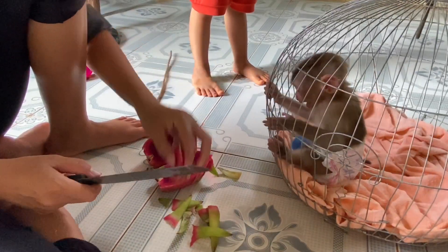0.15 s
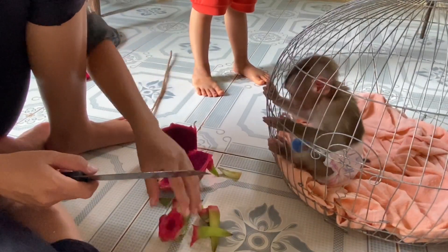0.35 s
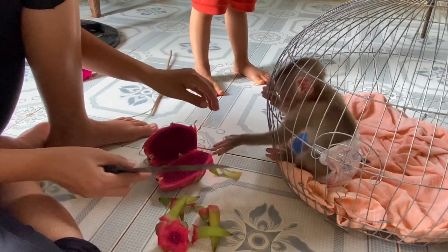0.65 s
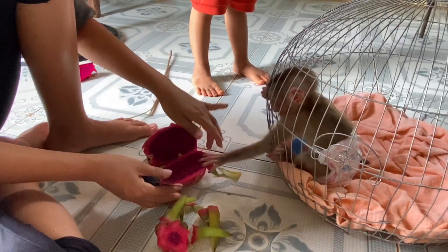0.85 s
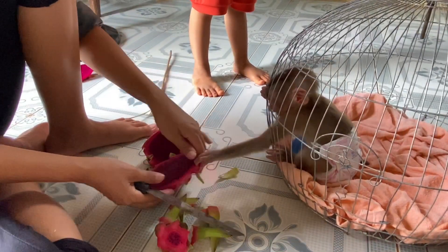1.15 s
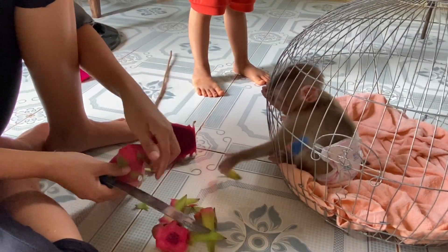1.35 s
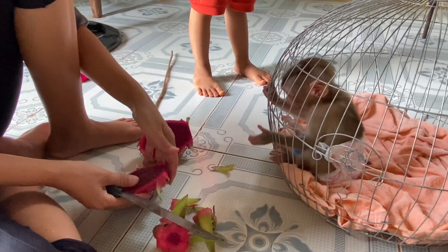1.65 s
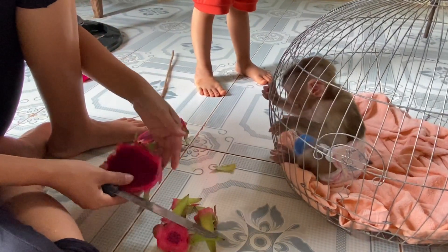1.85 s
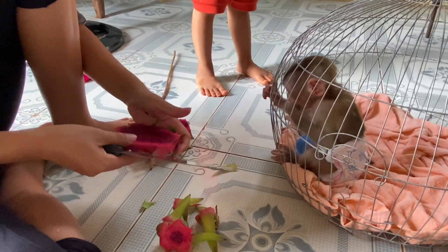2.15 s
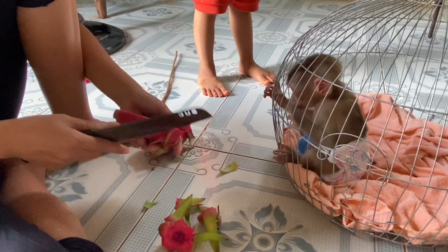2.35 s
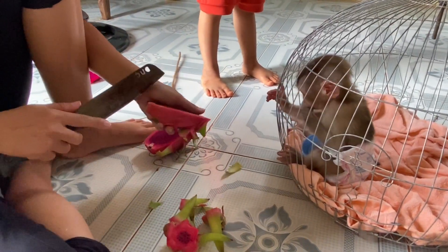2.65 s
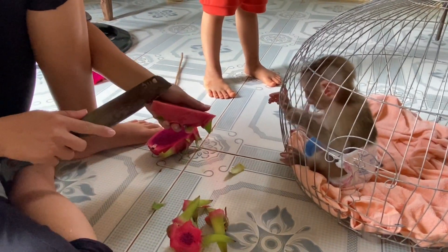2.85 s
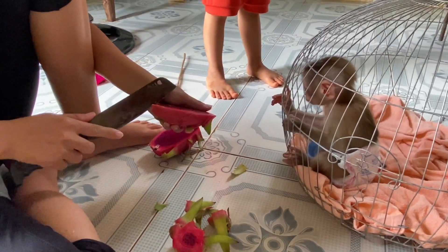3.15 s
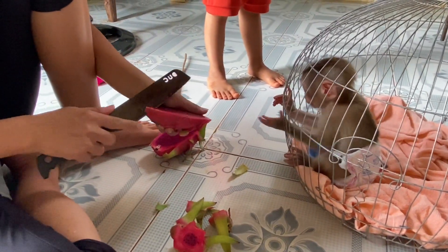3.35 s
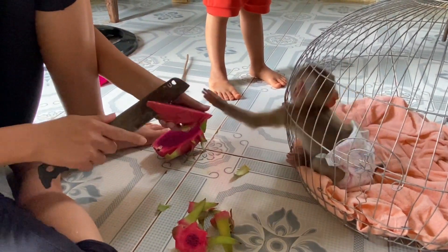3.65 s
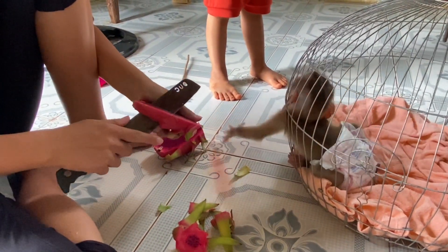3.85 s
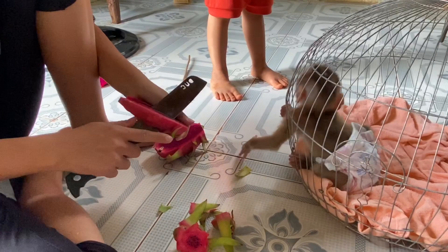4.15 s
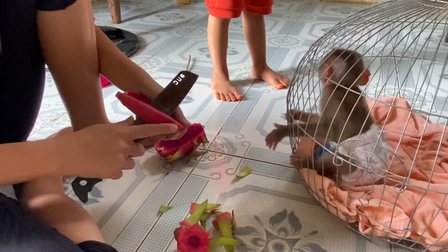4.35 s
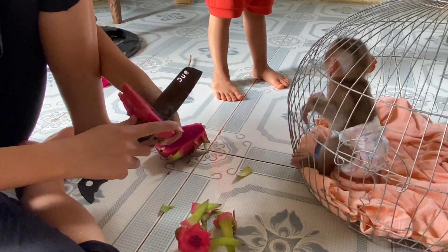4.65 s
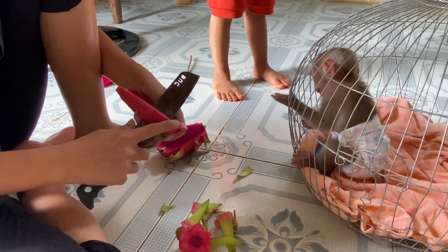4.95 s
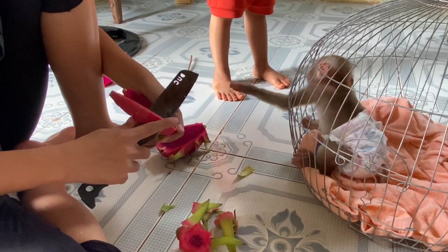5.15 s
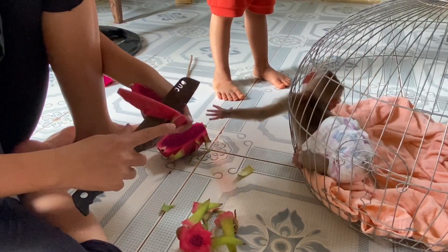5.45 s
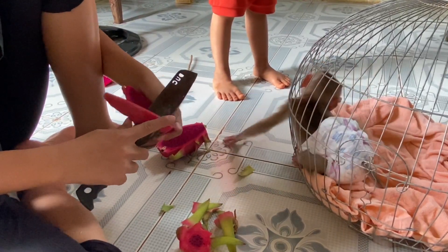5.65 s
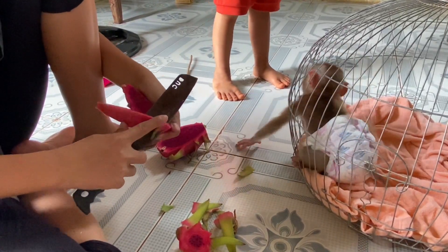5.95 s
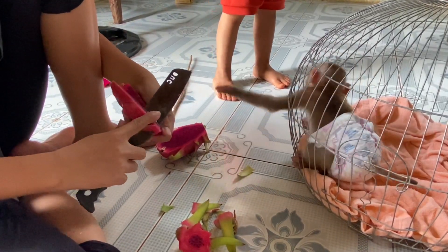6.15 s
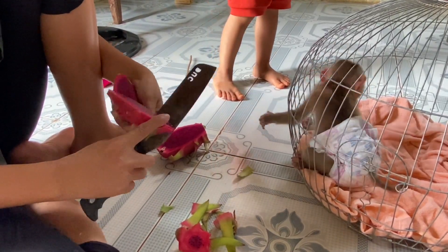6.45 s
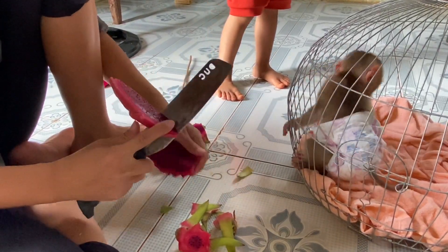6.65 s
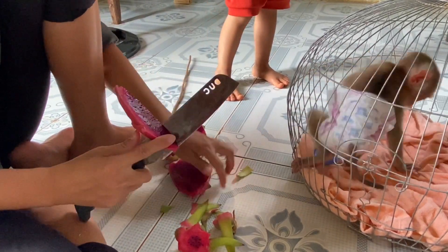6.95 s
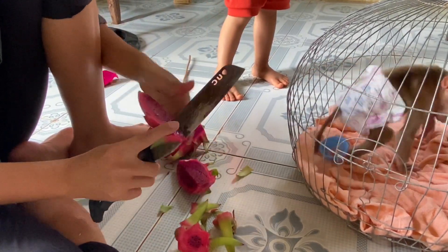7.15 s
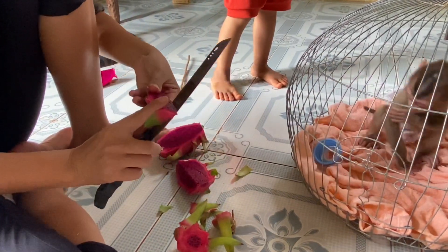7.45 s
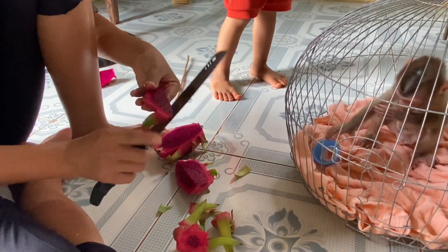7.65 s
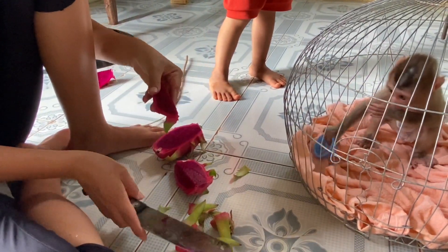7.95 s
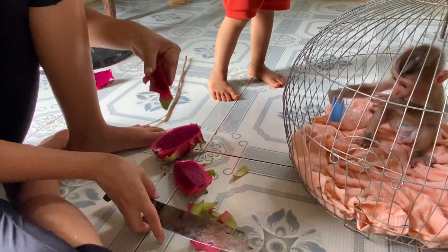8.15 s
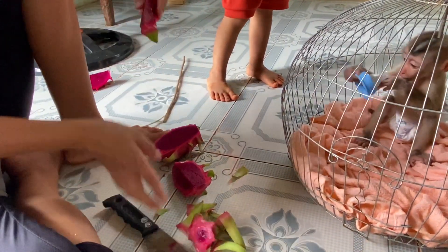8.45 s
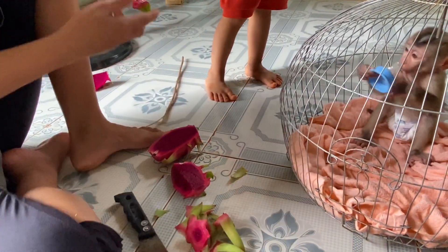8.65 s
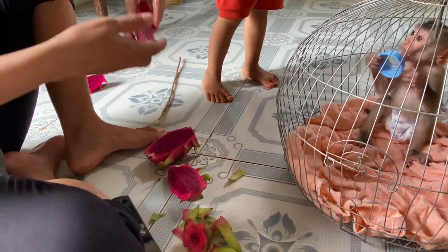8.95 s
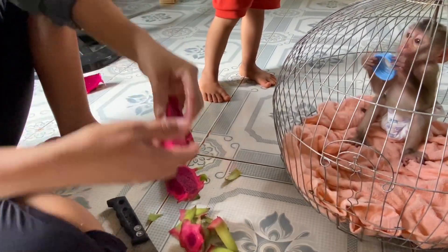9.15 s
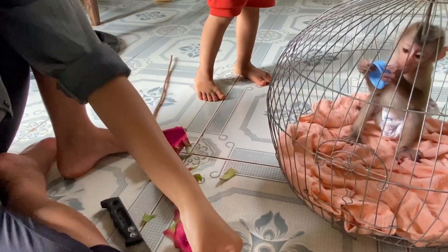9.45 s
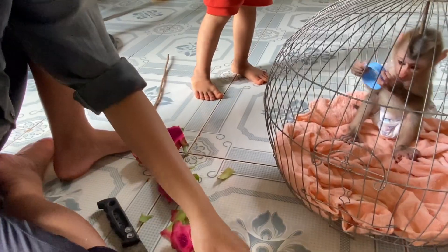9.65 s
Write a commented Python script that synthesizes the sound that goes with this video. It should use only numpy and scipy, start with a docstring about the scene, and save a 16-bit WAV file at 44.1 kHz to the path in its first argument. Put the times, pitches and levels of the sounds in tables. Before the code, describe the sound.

A baby monkey gives short, piercing squeaks, then harsher rough screams in a hard tiled room, before a knife clacks down on the floor.

```python
"""A baby monkey in a wire cage begs for fruit: each squeak holds a note, mostly at 2-4 kHz, then turns
rough and usually plunges, as an unstable fold oscillator with overtones, half tones and coloured noise.
Swept sines whistle and hoarse noise swells ahead of longer screams; sines and cracks make a knife laid
on a tiled floor. Decaying noise rings as the hard room, over coloured hiss and a faint buzz of sines."""
import sys
import numpy as np
from scipy import signal
from scipy.fft import rfft, irfft, next_fast_len
from scipy.io import wavfile
from scipy.ndimage import uniform_filter1d, minimum_filter1d, map_coordinates

SR = 44100
rng = np.random.default_rng(int(sys.argv[2]) if len(sys.argv) > 2 else 0)


def file_out(sig):
    """Save sig as 16-bit WAV at sys.argv[1]."""
    # one column per channel
    cols = np.atleast_2d(sig).T
    # limit, then scale
    lim = np.clip(cols, -1, 1)
    pcm = np.round(lim * 32767).astype(np.int16)
    wavfile.write(sys.argv[1], SR, pcm)


N = 431738
T = np.arange(N) / SR
TOP_HZ = 16000  # overtones stop here; the final low-pass lies just above

# colour of air forced through the tight throat: (frequency [Hz], relative level [dB])
HOARSE_AIR = [(1200, -29), (2800, -12), (4200, -4.5), (5400, -10), (6800, 6), (9000, 1), (12500, -1),
              (15000, 5.5), (17000, -30)]


def undb(db):
    """Amplitude ratio of a level in decibels."""
    return 10 ** (np.asarray(db) / 20)


def unit(x):
    """Normalise the root-mean-square amplitude to 1."""
    return x / np.sqrt(np.mean(x ** 2) + 1e-20)


def gain_at(hz, points):
    """Spectral envelope: levels interpolated linearly in dB over log frequency."""
    f, db = np.transpose(points)
    return undb(np.interp(np.log(np.maximum(hz, 1)), np.log(f), db))


def noise(n, points):
    """Spectral shaping: white noise weighted by an envelope, rms 1."""
    spectrum = rfft(rng.standard_normal(n))
    return unit(irfft(spectrum * gain_at(np.fft.rfftfreq(n, 1 / SR), points), n))


def wobble(n, rate_hz):
    """Band-limited random modulation: a smooth curve through normal draws at the given rate."""
    count = int(n * rate_hz / SR) + 4
    draws = rng.standard_normal(count)
    return map_coordinates(draws, [np.arange(n) * rate_hz / SR + 1], order=2, mode="nearest")


def add(track, start, sound):
    """Superposition: mix a sound into a track from a start time in seconds."""
    i = int(round(start * SR))
    sound = sound[..., max(-i, 0):N - i]
    track[..., max(i, 0):max(i, 0) + sound.shape[-1]] += sound


def background():
    """Stationary noise: a faintly wavering hiss, sines as a buzz, and a soft rush that comes and goes."""
    # hiss common to both sides: (frequency [Hz], relative level [dB])
    mid_colour = [(18, -50), (30, -8), (109, -2.5), (170, -9), (233, -9), (499, -18.5), (540, -30.5),
                  (1130, -25.5), (1670, -4), (2480, -15), (3310, 2.5), (11700, -20), (13300, -39),
                  (14400, -23.5), (16000, -19)]
    # hiss opposed between the sides: (frequency [Hz], relative level [dB])
    side_colour = [(18, -47), (30, -17), (486, -25.5), (526, -8), (569, -26), (1100, -34), (1720, -7.5),
                   (2480, -19.5), (3580, -7), (8300, -20), (9970, -27), (10800, -55), (12000, -30),
                   (14400, -24.5), (16000, -40)]
    # buzz: (frequency [Hz], mean level [dB], phase of the right ahead of the left [rad])
    buzz_lines = [(123, -84, 0.14), (537.7, -63, 2.16), (1860, -60, 2.13)]
    hiss_db, side_db = -45, -1  # the opposed part is relative to the common part
    mid = noise(N, mid_colour) * undb(hiss_db + 0.083 * wobble(N, 4.7))
    side = noise(N, side_colour) * undb(hiss_db + side_db + 0.86 * wobble(N, 9))
    buzz = 0
    for hz, db, lead in buzz_lines:
        level = np.sqrt(2) * undb(db + wobble(N, 2.94))
        phase = 2 * np.pi * hz * T + 0.3 * wobble(N, 6.4)
        buzz = buzz + level * np.sin(phase + np.array([[0], [lead]]))
    swell = np.interp(T, [4.2, 4.55, 5.05, 5.55], [0.19, 1, 0.99, 0.25])
    swell = swell * undb(-59.5 + 3.5 * wobble(N, 25))
    rush_colour = [(100, -52), (450, 4), (800, 5), (1400, -10), (3000, -30), (8000, -60)]
    rush = np.array([noise(N, rush_colour) for _ in range(2)])
    return np.array([mid + side, mid - side]) + buzz + swell * rush


def room(dry):
    """Reverberation by convolution: sparse early echoes, then exponential decay, longest near 2 kHz."""
    # reverberant bands: (centre [Hz], 60 dB decay time [s], relative level [dB])
    decay_bands = [(250, 0.38, 2.5), (920, 0.49, 6), (1950, 0.62, 0), (3560, 0.59, 0), (6600, 0.52, -7),
                   (11200, 0.43, -8.5), (16000, 0.34, -15)]
    early_db, early_s = -11, 0.0087  # level and decay constant of echoes from the floor and near things
    t = np.arange(int(1.2 * SR)) / SR
    f = np.fft.rfftfreq(len(t), 1 / SR)
    centres = np.log([row[0] for row in decay_bands])
    wet = []
    for side in dry:
        spectrum, response = rfft(rng.standard_normal(len(t))), 0
        for share, (hz, t60, db) in zip(np.eye(len(decay_bands)), decay_bands):
            band = irfft(spectrum * np.interp(np.log(f + 1), centres, share), len(t))
            # level independent of decay time
            energy_scale = np.sqrt(2 * np.log(1000) / (t60 * SR))
            response = response + band * undb(db - 60 * t / t60) * energy_scale
        chosen = rng.standard_normal(len(t)) * (rng.random(len(t)) < .03)
        echoes = chosen * np.exp(-t / early_s) * (t > .002)
        response = response * np.minimum(t / 0.0011, 1)
        response = response + undb(early_db) * echoes / np.linalg.norm(echoes)
        wet.append(signal.fftconvolve(side, response)[:N])
    return np.array(wet)


def ports(x, pan_db):
    """Interaural-like cues: a level difference, and above 5.3 kHz a later arrival at the left."""
    lag_s = .000188
    size = next_fast_len(N + 32)
    # one whole turn leaves the lower frequencies in step
    turns = np.maximum(np.fft.rfftfreq(size, 1 / SR) * lag_s, 1)
    late = irfft(rfft(x, size) * np.exp(-2j * np.pi * turns), size)[:N]
    return np.array([late * undb(pan_db / 2), x * undb(-pan_db / 2)])


def knife():
    """Impact excitation: handle, then rattling blade; each contact cracks and rings the steel's modes."""
    # contacts with the floor: (time [s], level [dB], spectral peak [Hz], time for the crack to fall
    # 30 dB [s], relative ring level [dB])
    contacts = [(8.39, -19, 2320, 0.01, 1), (8.408, -33, 1850, 0.01, 14), (8.44, -20, 6300, 0.018, 2.5),
                (8.446, -22, 6150, 0.013, -1.5), (8.464, -42, 6000, .094, 16),
                (8.4838, -13.5, 14000, 0.0089, -4.5), (8.551, -29.5, 4000, 0.021, 1),
                (8.589, -29.5, 11000, 0.014, 2), (8.6015, -23.5, 9500, 0.012, -0.5)]
    # blade modes: (frequency [Hz], relative level before contact colour [dB], 60 dB decay time [s])
    blade_modes = [(1040, -15, 0.071), (2500, -12, .1), (3680, 4.5, 0.064), (4485, 7, 0.12),
                   (5340, 10, 0.056), (6000, 5, 0.11), (6474, 17, 0.024), (7510, 5, 0.1), (7510, -33, 0.08),
                   (8580, -11, .15), (10200, -15, 0.13), (15500, 8, .08)]
    out, t = np.zeros((2, N)), np.arange(SR // 3) / SR
    for start, db, hz, length, ring_db in contacts:
        colour = [(hz / 12, -24), (hz / 3.2, -8), (hz, 0), (hz * 2, -12), (hz * 6, -22)]
        for side in out:
            crack = noise(len(t), colour) * undb(-60 * t / length / 2)
            ring = 0
            for f, mode_db, t60 in blade_modes:
                level = undb(mode_db - 60 * t / t60) * gain_at(f, colour)
                ring = ring + level * np.sin(2 * np.pi * f * t + rng.uniform(0, 2 * np.pi))
            onset = np.minimum(t / 0.00052, 1)
            add(side, start, undb(db) * (crack + undb(ring_db - 12.5) * ring) * onset)
    return out


def chirp(length, pitches, db, waver):
    """Frequency modulation: a near-pure tone swells, glides through three pitches and fades."""
    u = np.linspace(0, 1, int(length * SR))
    arch = np.polyval(np.polyfit([0, .5, 1], pitches, 2), u)
    hz = arch * (1 + waver * wobble(len(u), 820))
    return np.sqrt(2) * undb(db) * np.sin(np.pi * u) * np.sin(2 * np.pi * np.cumsum(hz) / SR)


def grunt(db):
    """Slack-fold oscillation: one low, wavering flap sinks in pitch."""
    return chirp(0.0232, [396, 262, 206], db, waver=0.39)


def smacks():
    """Lip release: a short falling blip as the lips part, then a slack grunt."""
    # lip smacks: (time [s], middle pitch [Hz], level [dB])
    smack_table = [(0.483, 1305, -45), (0.787, 2110, -39)]
    length_s, grunt_db = 0.0072, -50.5
    out = np.zeros(N)
    for start, hz, db in smack_table:
        add(out, start, chirp(length_s, [1.05 * hz, hz, 0.91 * hz], db, waver=0.064))
        add(out, start + length_s, grunt(grunt_db))
    return out


def whistles():
    """Whistle tones: thin, very high gliding sines squeezed out ahead of screams."""
    # whistles: (time [s], length [s], start [Hz], middle [Hz], end [Hz], level [dB])
    whistle_table = [(3.854, 0.17, 13700, 15200, 11300, -40.5), (4.345, 0.028, 8540, 8150, 8000, -29.5),
                     (4.348, 0.086, 9700, 10800, 12300, -43.5), (5.938, 0.17, 9900, 14300, 13900, -37),
                     (7.245, .11, 9300, 13000, 9100, -34)]
    out = np.zeros(N)
    for start, length, *pitches, db in whistle_table:
        add(out, start, chirp(length, pitches, db, waver=0.022))
    return out


def strain(length, hz, shred_db):
    """Turbulence with intermittent phonation: a fluttering hoarse hiss with wavering shreds of tone."""
    flutter_db, grain_db = 2.04, 2.3  # spread of slow and fast level changes
    n = int(length * SR)
    waver = .035 * wobble(n, 62.6) + 0.036 * wobble(n, 1208)
    phase = 2 * np.pi * np.cumsum(hz * (1 + waver)) / SR
    upper = np.sin(1.5 * phase) + np.sin(2 * phase)
    shreds = unit((np.sin(phase) + undb(-3) * upper) * np.abs(wobble(n, 63)))
    hoarse = unit(noise(n, HOARSE_AIR) + undb(shred_db) * shreds)
    return hoarse * undb(flutter_db * wobble(n, 84) + grain_db * wobble(n, 900))


def squeals():
    """Turbulence with more or less voice: strained air, from nearly toneless to a wavering squeal,
    swells, sags and stops."""
    # squeals: (time [s], length [s], pitch [Hz], peak level [dB], tone over hiss [dB])
    squeal_table = [(5.92, 0.049, 3340, -28, -15), (6.57, 0.33, 4300, -36.5, -4.5),
                    (6.707, 0.096, 4190, -33, 10), (6.781, 0.11, 4240, -30.5, 1),
                    (7.343, 0.085, 4150, -27.5, -12)]
    out = np.zeros(N)
    for start, length, hz, db, tone_db in squeal_table:
        strained = strain(length, hz, shred_db=tone_db)
        effort = np.interp(np.linspace(0, 1, len(strained)), [0, .35, .85, 1], [0, 1, 0.53, 0])
        add(out, start, strained * undb(db) * effort)
    return out


def partial(ratio, hz, phase, offset=0):
    """Source-filter principle: one partial of the folds, weighted by the throat's resonances."""
    # throat colour of partials: (frequency [Hz], relative level [dB])
    throat_colour = [(1000, -12), (2000, 11), (3500, 7.5), (5500, -2), (7200, 6.5), (8800, 1), (10500, 4.5),
                     (12500, -1.5), (14800, 4), (17000, -11)]
    level = gain_at(ratio * hz, throat_colour) * (ratio * hz < TOP_HZ)
    return level * np.sin(ratio * phase + offset)


def squeak(hold, fall, pitches, hold_db, fall_db, overtone_db, fall_rough, rasp_db, fade, air_db):
    """Fold instability: a held note slackens; roughness adds jitter, half tones, rasp and rushing air."""
    # colour of rushing air: (frequency [Hz], relative level [dB])
    air_colour = [(300, 2), (900, -7.5), (1800, 3), (3600, -9), (5200, 6), (7200, 36.5), (9000, 7),
                  (12500, -18), (15000, -14), (17000, -79)]
    jitter, shimmer = 0.1144, 0.49  # relative spread of pitch and amplitude at full roughness
    t = np.arange(int((hold + fall) * SR)) / SR
    n = len(t)
    stage = np.interp(t, [0, hold, hold + fall], [0, 1, 2])  # 0-1 held, 1-2 falling
    slack = np.maximum(stage - 1, 0)
    # the held note has a small roughness of its own and a share of the fall's
    hold_rough = 0.03 + 0.39 * fall_rough
    rough = np.clip(np.interp(stage, [.75, 1.2], [hold_rough, fall_rough]), 0, 1)
    # the pitch gives way slowly, then ever faster
    glide = np.minimum(stage, 1) + slack ** 1.6
    hz = np.exp(np.interp(glide, [0, 1, 2], np.log(pitches)))
    phase = 2 * np.pi * np.cumsum(hz * (1 + jitter * rough * wobble(n, 1500))) / SR

    # low calls have fewer high overtones
    slope = np.interp(pitches[1], [1800, 3600], [1.3, .6])
    overtones = sum(k ** -slope * partial(k, hz, phase, rng.uniform(0, 2 * np.pi)) for k in range(2, 7))
    halves = sum(partial(k + .5, hz, phase) for k in range(1, 4))
    roughness_sound = rough * halves + undb(air_db) * noise(n, air_colour)
    upper = (1 - 0.04 * rough) * unit(overtones) + rough * roughness_sound

    # the rasp sits at the end pitch and is strongest early in the fall
    rasp = undb(rasp_db) * rough * wobble(n, 1099) * np.sin(2 * np.pi * pitches[2] * t)
    rasp = rasp * np.interp(stage, [0, 1, 1.3, 2], [0.093, 0.12, 0.33, 0.14])
    tone = np.sin(phase) * np.minimum(hz / pitches[2], 1) ** (fade * rough)
    voice = np.sqrt(2) * (tone + rasp) + undb(overtone_db) * upper
    voice = voice * (1 + shimmer * rough * wobble(n, 876.5))

    # two pushes: the note, then the break
    held, falling = undb(hold_db), undb(fall_db)
    levels = [0, 0.57 * held, held, 0.81 * min(held, falling), falling, 0.49 * falling, 0]
    return voice * np.interp(stage, [0, .25, .6, 1, 1.18, 1.55, 2], levels)


def screams():
    """Onset of phonation: a hoarse hiss swells until the voice catches, then gives way to the scream."""
    # screams: (time [s], hoarse lead-in [s], hold [s], fall [s], start [Hz], knee [Hz], end [Hz],
    # hold level [dB], fall level [dB], overtones relative to tone [dB], roughness of the fall [clipped to 0-1])
    scream_table = [(4.032, 0.074, 0.043, 0.061, 4680, 4540, 1920, -22.5, -27, 0.5, 0.8),
                    (4.464, 0.084, .012, 0.019, 4460, 3910, 2580, -28.5, -28, 6, 0.4),
                    (4.484, .02, .014, .042, 4130, 4210, 2170, -20.5, -24, -6.5, 1.23),
                    (5.9, 0.015, 0.03, 0.0098, 3172, 3022, 3050, -20.5, -24.5, -10.5, 0.39),
                    (6.075, 0.019, 0.029, 0.015, 4820, 4650, 4500, -15.5, -20, -4, 0.16),
                    (6.189, 0.055, .036, .042, 4906, 3463, 1876, -21.5, -31, 5, 0.62),
                    (6.498, 0.0041, .017, 0.058, 1537, 3178, 3320, -26, -22, -6.5, 0.53),
                    (6.929, 0.049, .042, .055, 4400, 3710, 2410, -21, -24, -0.5, 0.76),
                    (7.462, 0.065, .048, .026, 3820, 3520, 1894, -18.5, -26.5, 0.5, .38)]
    overlap_s = 0.07  # the hiss fades this long under the scream
    lead_db, rise_db = -9, 29  # peak of the hiss relative to the held note, and its swell
    out = np.zeros(N)
    for row in scream_table:
        start, lead, hold, fall, start_hz, knee_hz, end_hz, db, fall_db, overtone_db, rough = row
        hiss = strain(lead + overlap_s, start_hz, shred_db=-2.5)
        t = np.arange(len(hiss)) / SR
        swell_db = np.interp(t, [0, lead, lead + overlap_s], [-rise_db, 0, -rise_db])
        add(out, start - lead, hiss * undb(db + lead_db + swell_db))
        scream = squeak(hold, fall, [start_hz, knee_hz, end_hz], db, fall_db, overtone_db, rough,
                        rasp_db=-4.5, fade=2.6, air_db=0.5)
        add(out, start, scream)
    return out


def pop(db):
    """Pressure release: a tick of bright air as the throat opens."""
    u = np.linspace(0, 1, int(0.0085 * SR))
    return undb(db) * noise(len(u), HOARSE_AIR) * np.interp(u, [0, .2, 1], [0, 1, 0])


def mouth(x):
    """Radiation from a small aperture: a high-pass, as so small a mouth radiates little bass."""
    return signal.sosfilt(signal.butter(4, 1100, "highpass", fs=SR, output="sos"), x)


def squeaks():
    """Voice break: a pop opens each note; the rougher, the deeper and weaker its fall; a grunt follows."""
    # squeaks, where overlapping rows sound two pitches at once: (time [s], hold [s], fall [s], start [Hz],
    # knee [Hz], hold level [dB], overtones relative to tone [dB], roughness of the fall [0-1])
    squeak_table = [(-.004, 0.011, 0.026, 3943, 3613, -12.5, -7, 0.71),
                    (.213, 0.017, 0.018, 3553, 3284, -15, -3.5, 0.86),
                    (1.218, 0.017, 0.012, 3235, 3104, -22.5, -3, 0.41),
                    (1.239, .014, 0.0059, 2620, 2970, -31, -20, 0),
                    (1.404, 0.016, 0.019, 3390, 3163, -14.5, -1.5, 0.79),
                    (1.59, .011, .008, 3775, 3510, -15.5, -1, 0.6),
                    (1.604, 0.014, 0.024, 3560, 3492, -12.5, -10, 0.91),
                    (1.823, .014, 0.025, 3905, 3735, -11, -7, 0.92),
                    (2.077, 0.02, 0.016, 3547, 3744, -14, -1.5, 0.88),
                    (3.44, .018, .019, 2060, 1565, -29, -5.5, 0.56),
                    (3.683, .034, .016, 2877, 2984, -33, -3, 0.33),
                    (3.688, 0.016, 0.019, 2276, 1674, -32, 4, 0.64),
                    (4.778, 0.042, 0.0188, 2012, 1870, -30, 0.5, 0.4),
                    (5.137, 0.02, 0.028, 3027, 2798, -23, -8, 0.28),
                    (5.437, 0.013, .012, 1970, 1920, -34, -13, 0.3),
                    (7.898, 0.017, 0.0078, 2110, 2120, -38, -22, 0.05),
                    (7.9, 0.012, .012, 1653, 1580, -38.5, -5, 0.38),
                    (7.918, 0.036, .012, 1074, 908, -41.5, -5, 0.5),
                    (9.671, 0.015, 0.016, 1500, 1377, -31, -6, 0.65)]
    plunge_octaves = 1.25  # fall after the knee at full roughness
    break_db, rough_break_db = 0.5, -10  # level change at the knee, and its addition at full roughness
    pop_db = -7  # relative to the held note
    grunt_delay_s, grunt_db, grunt_follow = 0.0023, -44.5, 0.35  # level after a 0 dB squeak; dB per dB
    calls, grunts = np.zeros((2, N))
    for start, hold, fall, start_hz, knee_hz, db, overtone_db, rough in squeak_table:
        end_hz = knee_hz * 2 ** (-plunge_octaves * rough)
        fall_db = db + break_db + rough_break_db * rough
        add(calls, start, pop(db + pop_db))
        call = squeak(hold, fall, [start_hz, knee_hz, end_hz], db, fall_db, overtone_db, rough,
                      rasp_db=-1.5, fade=.7, air_db=3.0)
        add(calls, start, call)
        add(grunts, start + hold + fall + grunt_delay_s, grunt(grunt_db + grunt_follow * db))
    return mouth(calls) + grunts


def scene():
    """Superposition of direct sound, reverberation and background as the monkey shifts in its cage."""
    # the monkey leans to the bars, then turns away to the right: (time [s], left minus right [dB])
    place = [(1.8, -1), (4, -1), (6.4, -0.5), (7.2, -1.5)]
    squeak_room_db = -3.5  # squeaks are aimed out through the bars and stir the room less
    pan_db = np.interp(T, *np.transpose(place))
    aimed = ports(squeaks(), pan_db)
    rest = ports(screams() + squeals() + whistles() + smacks(), pan_db) + knife()
    return aimed + rest + room(undb(squeak_room_db) * aimed + rest) + background()


def record(dry):
    """Peak limiting and low-pass filtering: gain eases down around the loudest peaks, the top is cut."""
    size = 128  # samples over which the gain is held and smoothed
    need = np.minimum(1, .88 / (np.abs(dry).max(axis=0) + 1e-9))
    gain = uniform_filter1d(minimum_filter1d(need, size), size)
    low_pass = signal.firwin(255, TOP_HZ + 100, window="blackman", fs=SR)
    return signal.fftconvolve(dry * gain, low_pass[None], mode="same", axes=1)


dry = scene()
out = record(dry)
file_out(out)
```